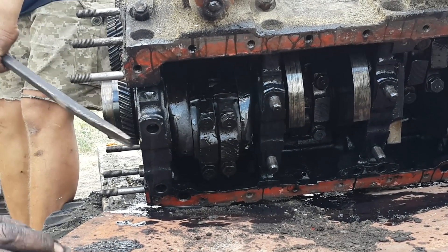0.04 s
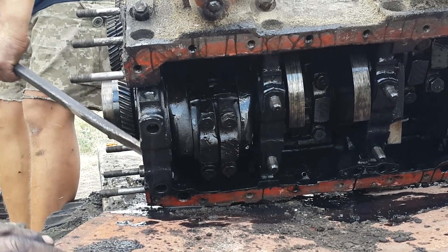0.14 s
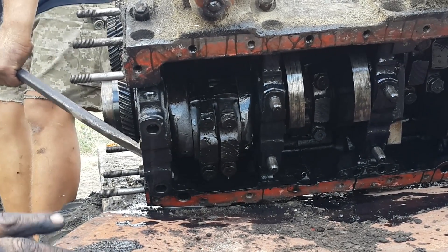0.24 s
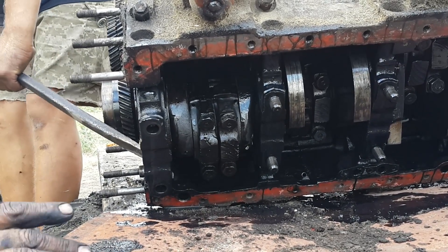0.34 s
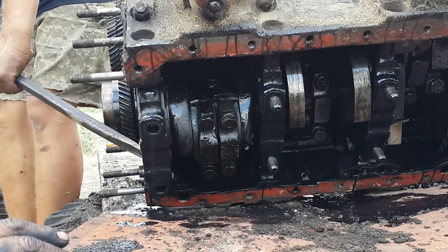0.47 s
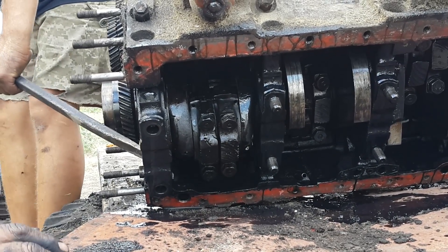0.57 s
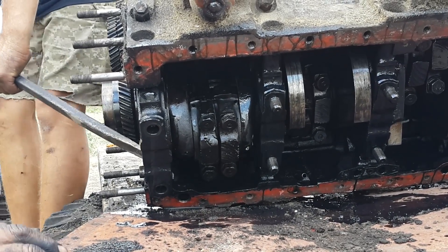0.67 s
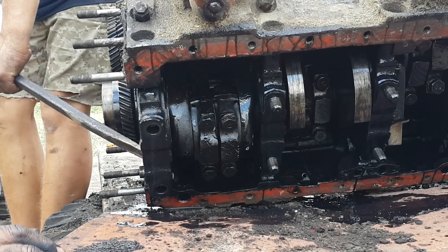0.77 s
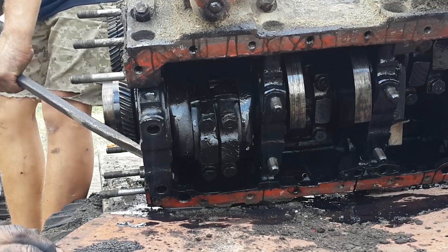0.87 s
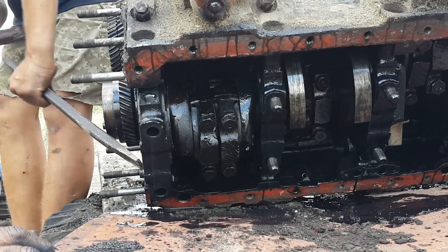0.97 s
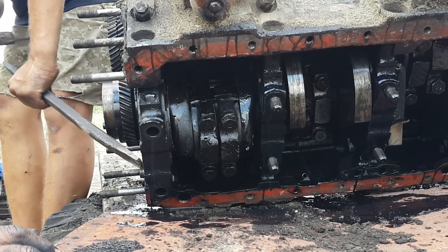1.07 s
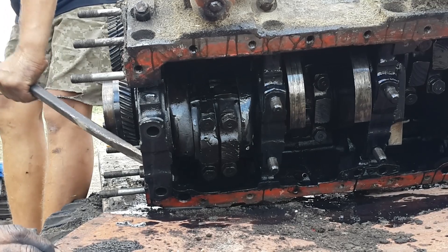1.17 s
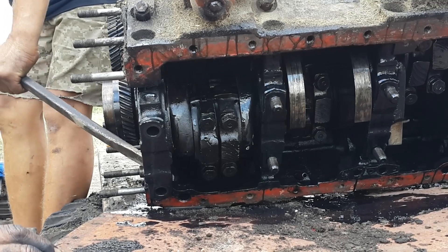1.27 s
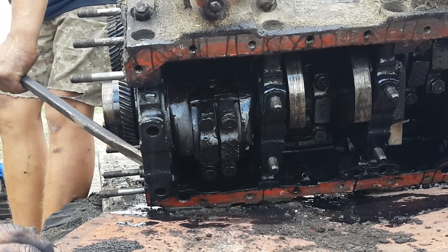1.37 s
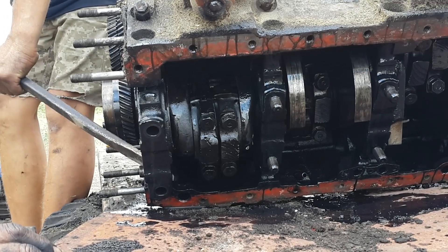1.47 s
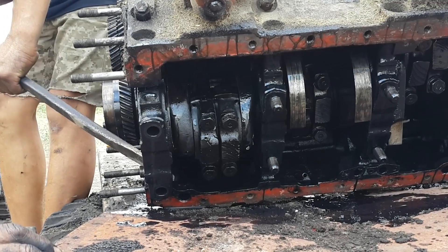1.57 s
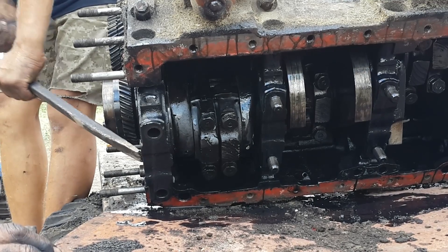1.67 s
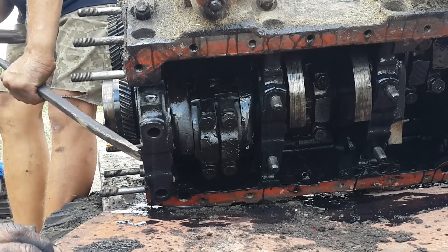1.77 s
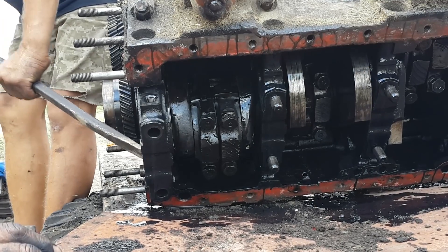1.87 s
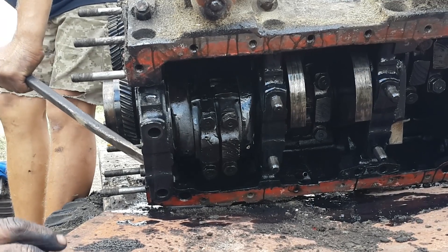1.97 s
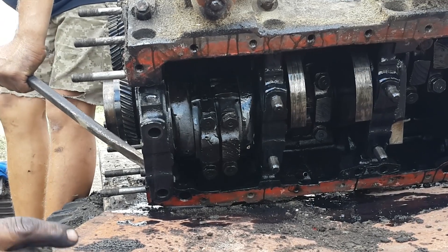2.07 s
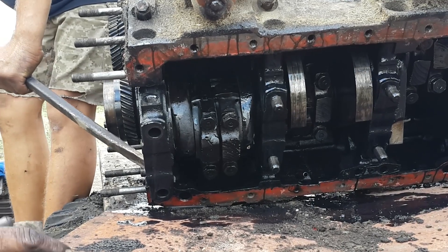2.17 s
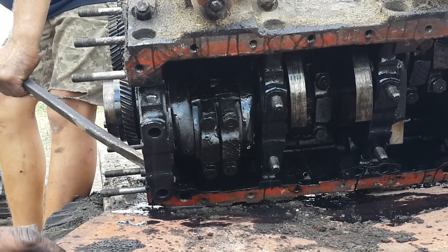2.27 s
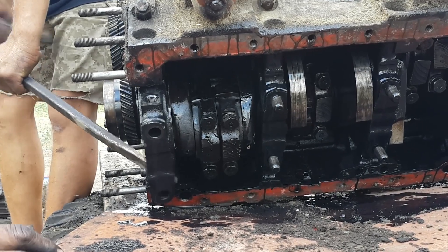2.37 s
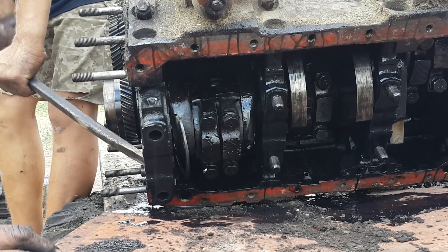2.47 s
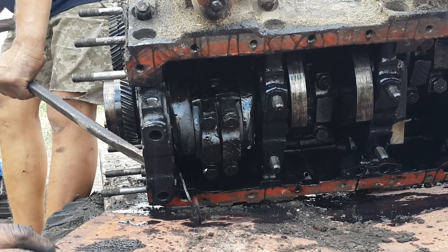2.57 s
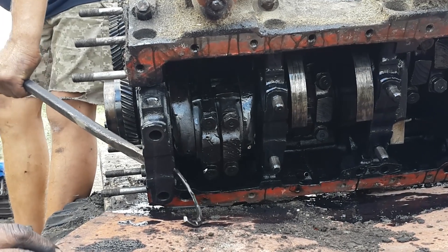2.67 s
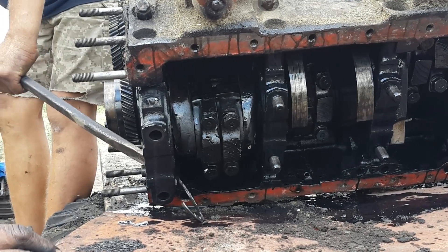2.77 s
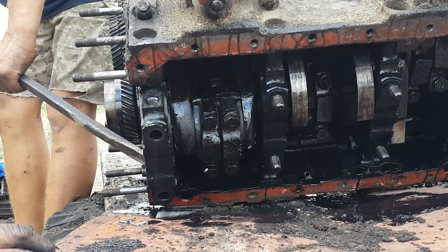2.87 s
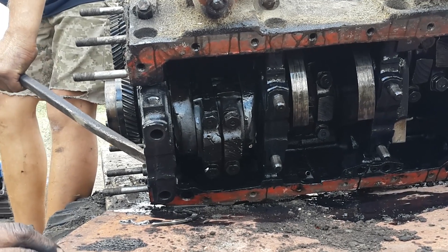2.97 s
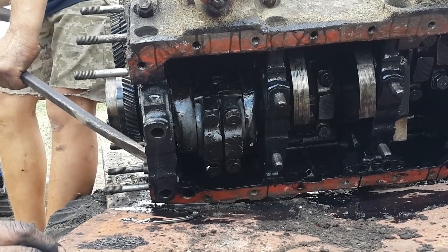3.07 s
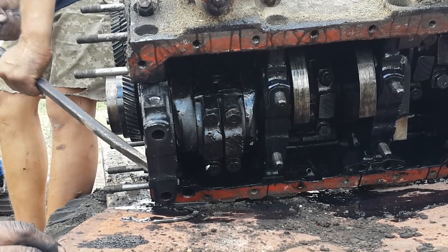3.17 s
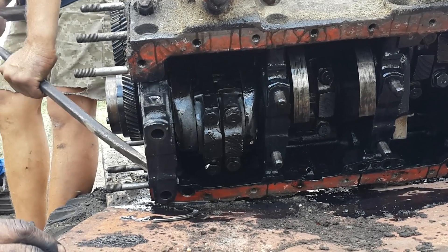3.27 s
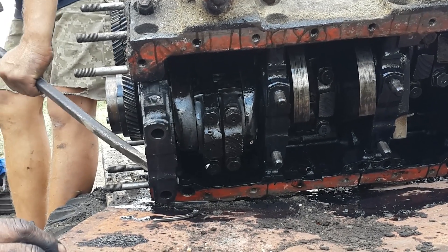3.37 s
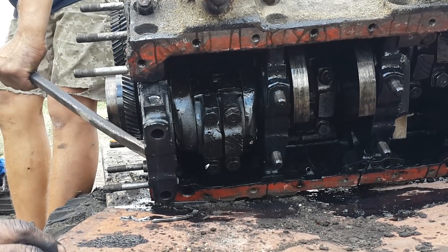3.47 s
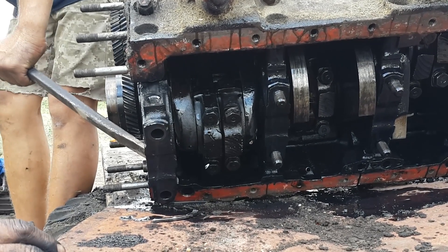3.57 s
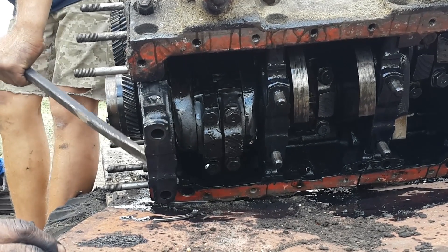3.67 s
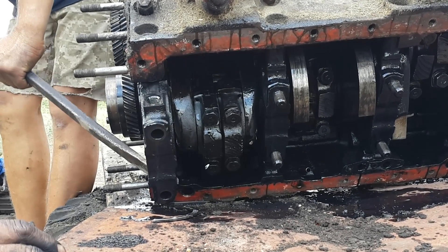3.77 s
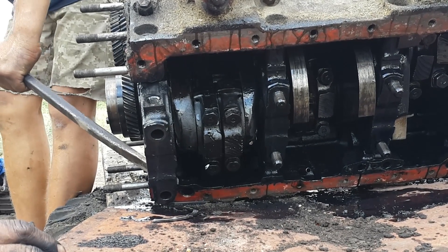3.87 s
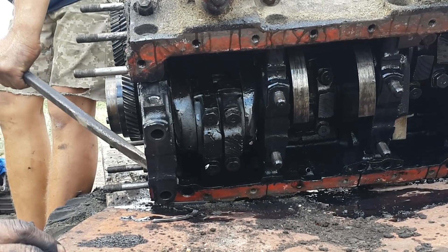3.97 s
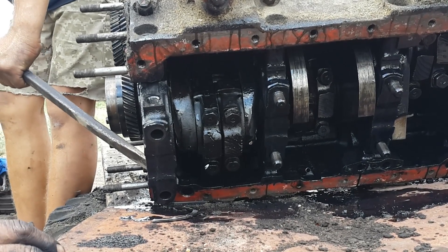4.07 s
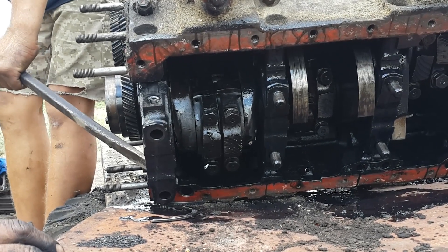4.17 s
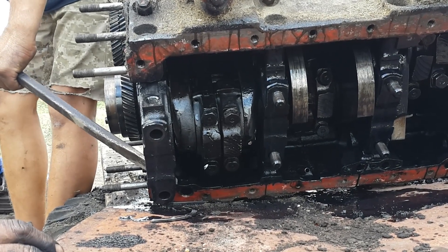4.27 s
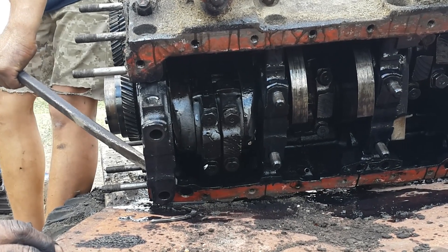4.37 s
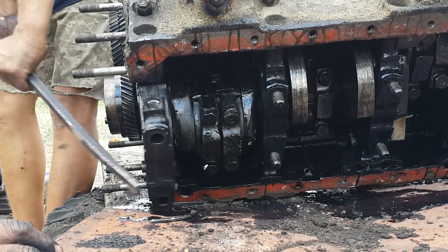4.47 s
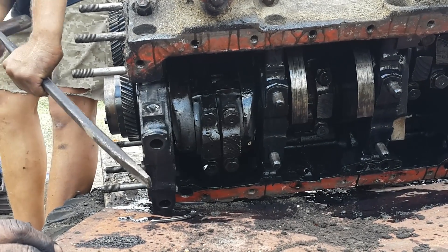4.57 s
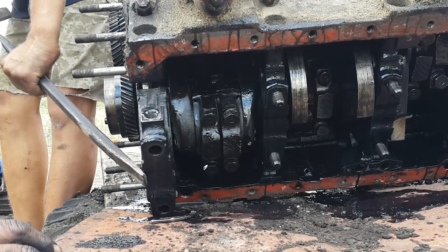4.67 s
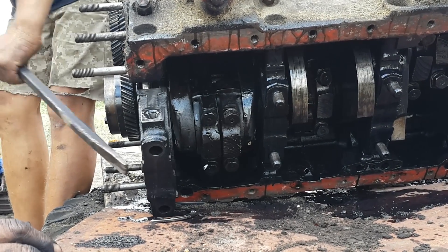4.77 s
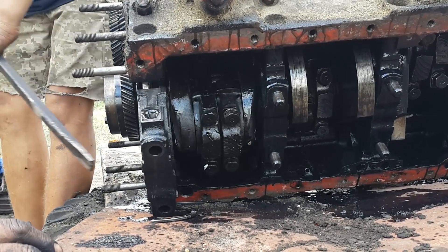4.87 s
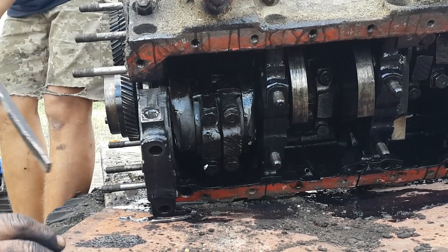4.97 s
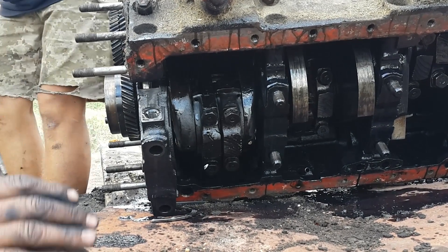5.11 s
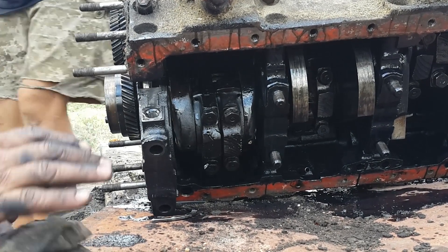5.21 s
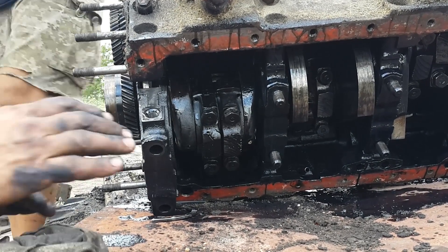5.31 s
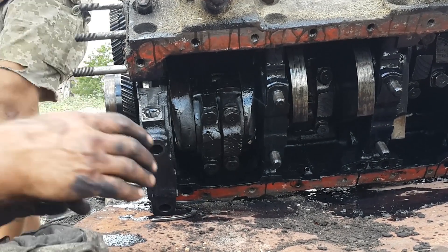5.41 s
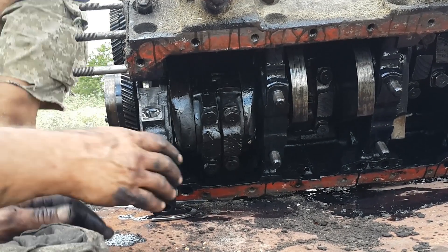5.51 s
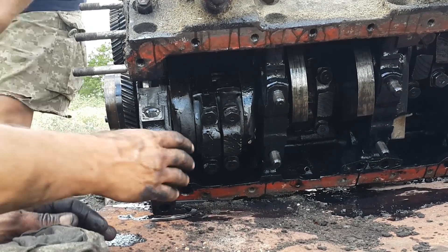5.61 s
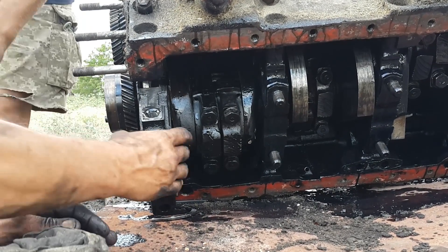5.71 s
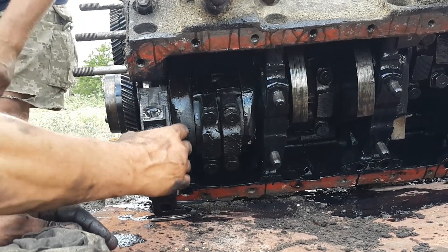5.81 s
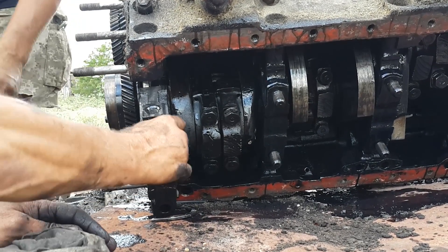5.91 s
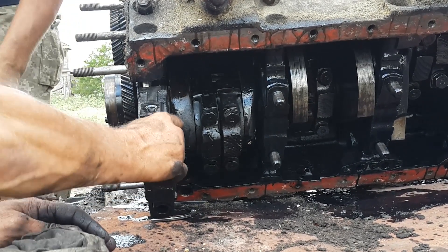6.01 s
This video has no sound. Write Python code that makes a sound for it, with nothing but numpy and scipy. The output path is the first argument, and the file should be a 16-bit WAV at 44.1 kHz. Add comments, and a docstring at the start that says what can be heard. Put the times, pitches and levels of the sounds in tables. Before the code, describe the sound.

Outdoors and very close, a steel bar taps, then strikes a seized part in an iron engine block five times, hard and distorted, with short damped clangs. Skids and tiny squeals follow some blows. A thin washer drops, clinks and rattles to rest after the third. Low gusts flutter against the left microphone, and finally a hand rubs softly with small ticks.

```python
"""Steel bar on a seized bearing cap

Outdoors, close to a phone: a bar is jabbed against the cap in an open cast-iron engine block.
Five hard blows, built from block noise and decaying bar modes, overload the microphones; between them
the bar taps, and its tip scrapes by random slips and squeals by short sweeps. A thin thrust washer rings
as decaying modes; knocks, ticks, hand rubs, wind on the left port and yard air are shaped noise,
with a wavering tone in the wind and a thin whine in the yard."""
import sys
import numpy as np
from scipy import signal
from scipy.fft import rfft, irfft, next_fast_len
from scipy.io import wavfile
from scipy.ndimage import uniform_filter1d

SR = 44100
rng = np.random.default_rng(int(sys.argv[2]) if len(sys.argv) > 2 else 0)


def put_to_file(sound):
    """Save the sound as 16-bit audio at rate SR, in the file named by the first command-line argument."""
    columns = np.atleast_2d(sound).T  # one column per channel
    safe = np.clip(columns, -1, 1)
    whole_steps = np.round(safe * 32767)
    wavfile.write(sys.argv[1], SR, whole_steps.astype(np.int16))


N = 266751
TIME = np.arange(N) / SR  # s
AGE = np.arange(int(.4 * SR)) / SR  # s since a contact
TOP_HZ = 15800  # upper limit of the microphones

# All spectra: (frequency [Hz], relative density [dB per Hz])
# open air of the yard
YARD_SPECTRUM = [(18, -46), (30, -21), (90, 4.5), (170, -5.5), (295, -21.5), (780, -12), (1670, -21),
                 (6380, -17.5), (7270, -23.5), (14000, -28), (16000, -19)]
YARD_DB = -67.2
WHINE_HZ, WHINE_DB = 9340, -80

# gusts at the left port: (time [s], length [s], relative level [dB], change along the gust [dB])
GUSTS = [(.07, .13, -36, -2), (.3, .23, -36.5, -7), (.67, 0.33, -40, 4), (1.003, .055, -27.5, -2),
         (1.225, .17, -38, 8), (1.473, .04, -24, -3.5), (1.669, 0.068, -39, -3), (2.056, 0.52, -31.5, 1),
         (2.66, 0.43, -36, 1), (3.431, 0.048, -37, -2), (3.52, 0.25, -32, -9), (3.877, .33, -56, -2),
         (4.7, .2, -54, -2), (4.908, .13, -47, 3), (5.19, .03, -56, -6), (5.373, 0.042, -58, -3),
         (5.68, 0.044, -41, 2), (5.84, 0.062, -40.5, 6.5), (5.982, .07, -45.5, -6)]
GUST_ATTACK_S, GUST_RELEASE_S = .009, .03
CALM_DB = -76  # air that still moves between gusts, relative as in GUSTS
# hardest single eddies slapping the port: (time [s], relative level [dB])
EDDIES = [(0.305, -26.5), (0.43, -38), (0.884, -20), (0.894, -21.5), (1.04, -31), (1.312, -26),
          (1.468, -24.5), (1.69, -37), (2.053, -23.5), (2.165, -32), (2.273, -30), (2.34, -33.5),
          (3.066, -25), (3.522, -31.5)]
# spectrum of the buffeting
BUFFET_SPECTRUM = [(20, -33.5), (45, -24), (80, -10), (130, -1), (230, -1.5), (330, -7), (500, -13.5),
                   (800, -29.5), (1300, -49), (2500, -62.5)]
# spectra of the wind's fine slap and its slow rumble
SLAP_SPECTRUM = [(150, -18.5), (400, -4), (750, -3.0), (1300, -18), (2400, -38), (5000, -71), (12000, -87.5)]
RUMBLE_SPECTRUM = [(20, -8.5), (70, 0.5), (130, 11.0), (250, -18.5), (800, -58.0), (2000, -86.0)]
# vortex flutter: pitch at the strongest gust, its change per dB of gust, level against the gust
VORTEX_HZ, VORTEX_OCTAVES_PER_DB, VORTEX_DB = 219.7, -0.04, -6

# skin and cloth rubs: (time [s], length [s], relative level [dB], change along the stroke [dB])
RUBS = [(4.4, 0.2, -66, -4), (5.191, 0.39, -66.5, -7.5), (5.607, 0.11, -64, -1), (5.712, 0.335, -58.5, 3.5),
        (5.978, 0.018, -44, 3)]
RUB_ATTACK_S, RUB_RELEASE_S = 0.01, .012
# spectrum of rubbing skin and cloth
SKIN_SPECTRUM = [(290, -7), (500, 9), (718, -10), (795, 0), (1380, 3), (1820, -2), (9770, -12.5),
                 (16000, -19)]
# spectrum of swishing shorts
SWISH_SPECTRUM = [(500, -23), (2500, -9.0), (5300, 2), (8000, -8.5), (14000, -26)]

# spectrum of the reflections from the ground and things nearby
TAIL_SPECTRUM = [(100, 9.0), (500, 12.0), (1500, -0.5), (4000, -14.0), (6500, -8), (9000, -14.5), (15000, -18)]

# dull knocks on the bed under the engine: (time [s], level [dB], 60 dB decay [s])
KNOCKS = [(2.731, -14.5, 0.23), (2.809, -42.5, 0.84), (2.907, -42, .25), (3.088, -23.5, .15),
          (3.121, -21, 0.16), (5.187, -42, .13)]
# spectrum of the knocked bed
BED_SPECTRUM = [(50, -16.5), (180, -7), (380, -3.5), (540, 4), (700, 1.5), (930, 9), (1200, 3.5),
                (2200, 0.5), (3500, -9.5), (6000, -12), (10000, -24.5), (16000, -41)]
# dry ticks of grit and fingertips: (time [s], level [dB])
TICKS = [(0.928, -48.5), (4.183, -61.5), (5.603, -31), (5.757, -49.5), (5.786, -50), (5.892, -48)]
# spectrum of small hard contacts
CLICK_SPECTRUM = [(200, -13.5), (900, -2), (2500, -0.5), (4200, 2), (6500, 0), (8000, -5.5), (10000, 3),
                  (12000, -16.5), (16000, -6.5)]

# the washer slips, lands and topples: (time [s], click level [dB], relative ring level [dB])
WASHER_HITS = [(2.575, -30, -19), (2.611, -14.5, -40), (2.657, -31.5, -38), (2.7297, -7.5, -46),
               (3.058, -40.5, -55.5), (3.0897, -10, -40.5), (3.094, -16, -41.5)]
# thin steel half ring: (frequency [Hz], relative level [dB], unscaled 60 dB decay [s], left minus right [dB])
WASHER_MODES = [(1292, -4, .3, 2), (1529, -3, .35, 2), (2719, -10, .35, 3), (4046, -6, .4, 7),
                (4912, -5, .35, 7), (6654, -9, .22, 6), (7020, -8, .26, 6), (8050, -2, .23, 7),
                (8500, -5, .45, 7), (9950, -2, .07, 9), (11565, -7, .2, 8), (12000, -12, .2, 8),
                (14068, -2, .23, 9)]
WASHER_TOP_HZ = 8500  # highest well-driven pitch
# rocking after landing: first touch, first gap, share of the gap kept each time
ROCKS_FROM_S, FIRST_GAP_S, GAP_SHARE = 2.809, .056, .71
# first touch, and loss from touch to touch
TOUCH_CLICK_DB, TOUCH_RING_DB, TOUCH_LOSS_DB = -32.5, -37, 3

# the work favours one port: (frequency [Hz], left minus right [dB])
FACING = [(100, -7.5), (400, 2), (750, -1), (1300, 0), (2400, 3), (4400, 12.5), (8000, 9.5), (15000, 5)]
# bar meets iron: (time [s], relative block level [dB], relative bar level [dB],
# highest well-driven pitch [Hz], flat over edgewise bending [dB])
BLOWS = [(0.0, -25, -40, 3400, 5), (0.252, -29, -22.5, 2500, 0), (0.327, -32, -40, 3000, 3),
         (1.0826, 5.5, -5, 6600, -2), (1.119, -19, -15, 3300, 3), (1.317, -49.5, -55, 4300, 11.5),
         (1.35, -31.5, -30.5, 2830, 18), (1.811, 7, 3, 5590, -4), (1.823, -5.5, -7.5, 3700, -19),
         (2.071, -32, -28, 2296, 13), (2.2, -38.5, -47, 3990, 0), (2.569, 8.5, 1.5, 5880, 5),
         (3.284, 4, 2.5, 5900, -1), (3.333, -25, -17.5, 7500, 10), (3.36, -25.5, -27.5, 3500, 4),
         (3.871, -39, -43.5, 4070, -7), (3.91, -38, -44.5, 2300, -4.5), (4.615, 6, -.5, 5290, -5),
         (4.675, -20, -18, 9070, -14), (4.746, -24, -25.5, 4400, -2), (4.869, -34, -33.5, 4350, 16)]
# flat bar pressed on the cap: (frequency [Hz], relative level [dB], unscaled 60 dB decay [s],
# left minus right [dB], bending plane [1 flat, -1 edgewise, 0 neither])
BAR_MODES = [(1165, -6, .18, -3, -1), (1290, -6, .09, -5, 0), (1375, -4, .09, -4, 0), (1527, -5, .1, -3, 0),
             (1900, -2, .17, 0, 1), (2000, -11, .09, 2, 0), (2178, -6, .17, 2, -1), (2666, -10, .09, 2, 0),
             (2917, -9, .09, 0, 0), (2987, 1, .19, -1, 1), (3408, -9, .1, 2, 0), (3482, 0, .15, 2, -1),
             (4064, -7, .12, 6, 0), (4286, -1, .15, 9, 1), (5047, -7, .14, 7, -1), (5822, -2, .16, 11, 1),
             (5965, -9, .11, 8, 0), (6569, -7, .17, 5, 0), (6850, -12, .15, 5, -1), (7520, -13, .12, 0, 1),
             (8510, -6, .19, 7, 0), (8900, -11, .13, 7, -1), (10770, -9, .12, 8, 0), (11420, -9, .13, 8, 0),
             (11930, -9, .12, 8, 0), (14100, -4, .14, 10, 0), (14750, -8, .14, 10, 0)]
# spectrum of the block's crowded, quickly damped modes
BLOCK_SPECTRUM = [(40, -34), (130, -11), (400, -9.5), (800, -7.5), (1200, 2), (1600, -0.5), (2600, -2),
                  (4000, -7), (6000, -9), (9000, -9), (13000, -13), (16000, -9)]
# spectrum of the crankcase walls
WALL_SPECTRUM = [(150, -5.5), (1100, 3), (3500, -7), (6500, -11), (10000, -20.5), (16000, -33.5)]
# a hard blow presses the tip on and shortens the ring: length factor at 0 dB, and its gain per dB softer
PRESSED_LENGTH, LENGTH_PER_DB = 0.52, 0.0089
# the tip skids over iron: (time [s], length [s], relative level [dB], change along the stroke [dB],
# highest well-driven pitch [Hz])
SKIDS = [(1.105, 0.036, -21, -6, 8500), (1.855, 0.011, -27, -3.5, 6000), (2.6, .04, -28, -10, 5490),
         (3.314, .05, -20.5, -14, 5900), (3.587, 0.1, -52, 4, 4300), (3.956, 0.033, -61, -4, 2200),
         (4.063, .055, -56.5, 6.5, 4200), (4.14, 0.011, -57, -2, 1900), (4.636, 0.079, -16.5, -6, 5620),
         (4.749, .06, -26, -3, 4200), (4.833, 0.057, -44.5, -1, 2880)]
SKID_ATTACK_S, SKID_RELEASE_S = .012, .009
SKID_LOW_HZ = 470  # slips are too small to move the block below this
# the skidding tip squeals: (time [s], relative level [dB], centre pitch [Hz], half length [s])
SQUEALS = [(3.348, -25.5, 5980, 0.0026), (4.661, -13.5, 5200, .0015), (4.68, -17, 5900, 0.0046),
           (4.681, -21.5, 8900, .004), (4.692, -16, 4960, .002), (4.794, -28, 2855, 0.0062)]
SQUEAL_FALL_OCTAVES = .04  # per half length


def undb(db):
    """Decibels to gain."""
    return 10 ** (np.asarray(db) / 20)


def unit(x):
    """Scale to rms 1."""
    return x / np.sqrt(np.mean(x ** 2))


def pan(db):
    """Left and right gains for a level difference."""
    return undb(np.array([[1], [-1]]) * db / 2)


def lookup(points, hz):
    """Read (frequency [Hz], value) points on a log-frequency axis."""
    point_hz, value = np.transpose(points)
    return np.interp(np.log(hz + 1), np.log(point_hz), value)


def colour(x, points):
    """Give a noise a spectrum, at rms 1."""
    size = next_fast_len(x.shape[-1])
    gain = undb(lookup(points, np.fft.rfftfreq(size, 1 / SR)))
    return unit(irfft(rfft(x, size) * gain, size)[..., :x.shape[-1]])


def at_ports(size, alike_hz=800):
    """Stereo noise from the work: long waves reach both ports alike, short ones differ; FACING sets the side."""
    hz = np.fft.rfftfreq(size, 1 / SR)
    mid, side = rfft(rng.standard_normal((2, size)))
    alike = 1 / (1 + (hz / alike_hz) ** 4)
    both = mid * np.sqrt(1 + alike) + np.array([[1], [-1]]) * side * np.sqrt(1 - alike)
    return irfft(both * pan(lookup(FACING, hz)), size)


def fade(t60):
    """Exponential decay by 60 dB in t60 seconds."""
    return undb(-60 * AGE / t60)


def walk(rate):
    """Smooth random wandering with rms 1, renewed at a rate in Hz."""
    hold = max(int(SR / rate), 1)
    steps = rng.standard_normal(N)[np.arange(N) // hold]
    return unit(uniform_filter1d(steps, hold))


def add(out, s, sound):
    """Mix a sound in at a time in seconds."""
    i = max(int(s * SR), 0)
    out[:, i:i + sound.shape[1]] += sound[:, :N - i]


def swell(s, length, db, change_db, attack_s, release_s):
    """A stroke or gust: it builds up until its start time, holds with a steady slope, then dies away."""
    out = np.zeros(N)
    near = (TIME > s - 4 * attack_s) & (TIME < s + length + 10 * release_s)
    age = TIME[near] - s
    hold = undb(db + change_db * np.clip(age / length, 0, 1))
    build = (np.minimum(age, 0) / attack_s) ** 2
    release = np.maximum(age - length, 0) / release_s
    out[near] = hold * np.exp(-build - release)
    return out


def contact(hz, top_hz, above_db=16, below_db=5.5):
    """Drive in dB: falls fast above a pitch set by the contact's hardness, gently below (dB per octave)."""
    octaves = np.log2((hz + 1) / top_hz)
    return -above_db * np.maximum(octaves, 0) + below_db * np.minimum(octaves, 0)


def port_lags(modes):
    """Each mode reaches the right port up to a third of a cycle before or after the left."""
    return np.array([[0], [1]]) * rng.uniform(-1, 1, len(modes)) / 3


def ring(modes, lags, drive_db, length, scatter_db=2.0):
    """Decaying modes of one contact; each strike weights them a little anew, with random signs."""
    hz, db, t60, pan_db = np.transpose(modes)[:4]
    size, turn = rng.standard_normal((2, len(hz)))
    gain = undb(db + drive_db + scatter_db * size)
    gain = gain * np.sign(turn) * np.sqrt(2 / np.sum(gain ** 2))
    swing = np.exp(np.outer(2j * np.pi * hz - np.log(1000) / (t60 * length), AGE))
    return ((gain * pan(pan_db) * np.exp(2j * np.pi * lags)) @ swing).imag


def yard():
    """Faint open-air noise, partly shared by the ports, with a thin, slightly wavering whine."""
    noise = rng.standard_normal((2, N)) + .6 * rng.standard_normal(N)
    air = colour(noise, YARD_SPECTRUM) * undb(YARD_DB + 1.2 * walk(3))
    whine = np.sin(2 * np.pi * np.cumsum(WHINE_HZ + 12 * walk(40)) / SR)
    return air + undb(WHINE_DB) * whine * pan(4.8)


def vortices(gust, wander_octaves=.15, flutter_db=3.5):
    """Vortices shed at the port: a wavering tone, lowest in the strongest gust and higher in weaker wind."""
    gust_db = 20 * np.log10(gust / gust.max())
    octaves = VORTEX_OCTAVES_PER_DB * gust_db + wander_octaves * walk(35)
    tone = np.sqrt(2) * np.sin(2 * np.pi * np.cumsum(VORTEX_HZ * 2 ** octaves) / SR)
    return undb(VORTEX_DB + flutter_db * walk(60)) * gust * tone


def slaps(decay_s, rise_s=0.00095):
    """Strength of the hard eddies: each arrives abruptly and blows itself out."""
    out = np.zeros((1, N))
    shape = np.minimum(AGE / rise_s, 1) * np.exp(-AGE / decay_s)
    for s, db in EDDIES:
        add(out, s, undb(db) * shape[None])
    return out[0]


def wind(flutter_db=3.5, slap_db=-17, snap_db=0.0, right_db=-22, rumble_db=-16, buffet_db=1.0):
    """Turbulence, mostly on the left port; the hardest eddies snap and reach higher in pitch."""
    gust = undb(CALM_DB) + sum(swell(*row, GUST_ATTACK_S, GUST_RELEASE_S) for row in GUSTS)
    breeze = gust * undb(buffet_db + flutter_db * walk(55))
    push = np.hypot(breeze, slaps(decay_s=0.018))
    # separate eddies, about 1000 a second, each a single swing of pressure
    bumps = (rng.random((2, N)) < 1000 / SR) * rng.standard_normal((2, N))
    left, right = colour(bumps, BUFFET_SPECTRUM)
    fine = colour(rng.standard_normal(N), SLAP_SPECTRUM)
    crackle = undb(7 * np.tanh(walk(110)))
    # the fine noise grows faster than the breeze
    gust_slap = undb(slap_db) * crackle * breeze * np.sqrt(breeze / breeze.max())
    slap = fine * (gust_slap + undb(snap_db) * slaps(decay_s=.004))
    # the sheltered right port hears weak buffeting and the slow rumble
    rumble = undb(rumble_db) * colour(rng.standard_normal((2, N)), RUMBLE_SPECTRUM) * breeze
    return np.array([left * push + slap + vortices(gust), undb(right_db) * right * push]) + rumble


def hand(grain_db=2.5):
    """Grainy rubbing of cloth and of the hand that grips the cap: noise under swelling effort."""
    effort = sum(swell(*rub, RUB_ATTACK_S, RUB_RELEASE_S) for rub in RUBS)
    # the shorts swish as the worker steps away
    passing = np.exp(-((TIME - 5.28) / 0.062) ** 2)
    swish = colour(at_ports(N), SWISH_SPECTRUM) * undb(-59) * passing
    rubbing = colour(at_ports(N), SKIN_SPECTRUM) * effort
    return (rubbing + swish) * undb(grain_db * walk(300))


def surroundings(x, wet_db=-34):
    """Weak, duller reflections from the ground and things nearby: a decaying noise tail."""
    tail = colour(rng.standard_normal((2, len(AGE))), TAIL_SPECTRUM)
    tail = tail * fade(.29) * np.minimum(AGE / .02, 1)
    tail = tail / np.sqrt(np.sum(tail ** 2) / 2)
    return undb(wet_db) * signal.fftconvolve(x, tail, axes=1)[:, :N]


def click(t60):
    """A short bright contact noise."""
    return colour(at_ports(len(AGE)), CLICK_SPECTRUM) * fade(t60)


def knocks_and_ticks():
    """The bed answers with dull decaying noise; grit and fingertips tick."""
    out = np.zeros((2, N))
    bed = colour(at_ports(len(AGE)), BED_SPECTRUM)
    for s, db, t60 in KNOCKS:
        add(out, s, undb(db) * bed * fade(t60) * np.minimum(AGE / 0.0013, 1))
    for s, db in TICKS:
        add(out, s, undb(db) * click(t60=0.024))
    return out


def rocking(count):
    """Touches of the rocking washer, each after a shorter gap and weaker than the last."""
    touches = []
    for k in range(count):
        s = ROCKS_FROM_S + FIRST_GAP_S * np.sum(GAP_SHARE ** np.arange(k))
        loss_db = k * TOUCH_LOSS_DB
        touches.append((s, TOUCH_CLICK_DB - loss_db, TOUCH_RING_DB - loss_db))
    return touches


def washer(click_t60=0.026, length=.82):
    """The loose washer clicks at each contact and its modes ring on thinly; after landing it rocks."""
    out, lags = np.zeros((2, N)), port_lags(WASHER_MODES)
    drive_db = contact(np.array(WASHER_MODES)[:, 0], WASHER_TOP_HZ)
    for s, click_db, ring_db in WASHER_HITS + rocking(count=5):
        tone = ring(WASHER_MODES, lags, drive_db, length)
        add(out, s, undb(click_db) * click(click_t60) + undb(ring_db) * tone)
    return out


def squeals(waver=.06):
    """Short bursts of fast stick-slip: tones unsteady in level and pitch, with a falling trend."""
    out, drift = 0, waver * walk(900)
    for s, db, hz, half_s in SQUEALS:
        along = (TIME - s) / half_s
        pitch = hz * 2 ** (drift - SQUEAL_FALL_OCTAVES * np.clip(along, -2, 2))
        tone = np.sqrt(2) * np.sin(2 * np.pi * np.cumsum(pitch) / SR)
        out = out + undb(db) * np.exp(-.5 * along ** 2) * tone
    return out * pan(7) * undb(3 * walk(1500) - 3)


def drag(slip_rate=450, slip_db=5, block_share=1.15, block_t60=0.035, length=.38, reach=1.4):
    """The skidding tip sticks and slips; every random slip ticks the bar and the block."""
    out, lags = np.zeros((2, N)), port_lags(BAR_MODES)
    block = block_share * colour(at_ports(len(AGE)), BLOCK_SPECTRUM) * fade(block_t60)
    slipping = rng.random(N) < slip_rate / SR  # slips per second
    strength = undb(slip_db * np.tanh(rng.standard_normal(N)))
    slips = unit(slipping * strength * rng.choice([-1, 1], N))
    for s, *stroke, top_hz in SKIDS:
        edges = [SKID_LOW_HZ, min(reach * top_hz, TOP_HZ)]
        band = signal.butter(2, edges, "bandpass", fs=SR, output="sos")
        drive_db = contact(np.array(BAR_MODES)[:, 0], top_hz)
        body = signal.sosfilt(band, block) + ring(BAR_MODES, lags, drive_db, length)
        body = body / np.sqrt(np.sum(body ** 2) / 2)
        force = slips * swell(s, *stroke, SKID_ATTACK_S, SKID_RELEASE_S)
        touching = np.flatnonzero(force)
        first, last = touching[0], touching[-1]
        add(out, first / SR, signal.fftconvolve(force[None, first:last + 1], body, axes=1))
    return out


def jabs(block_t60=0.11, rise_s=.0015, fresh=0.99, reach=1.1, after_db=-31, after_t60=0.27):
    """Each jab excites the block's dense damped modes and the bar in its two bending planes."""
    out, lags = np.zeros((2, N)), port_lags(BAR_MODES)
    hz, plane = np.transpose(BAR_MODES)[[0, -1]]
    casting, attack = at_ports(len(AGE)), np.minimum(AGE / rise_s, 1)
    # the tip settles against the iron and chokes the bar's ring
    choke = np.exp(-(AGE / .068) ** 3)
    for s, clang_db, ring_db, top_hz, flat_db in BLOWS:
        length = PRESSED_LENGTH - LENGTH_PER_DB * ring_db
        # one shared casting noise, plus a fresh part for each strike point
        clang = colour(casting + fresh * at_ports(len(AGE)), BLOCK_SPECTRUM)
        # contacts with a lower driven pitch lose more treble
        lowpass = signal.butter(2, min(reach * top_hz, TOP_HZ), fs=SR, output="sos")
        clang = unit(signal.sosfilt(lowpass, clang))
        # the crankcase walls ring on faintly behind the clang
        walls = colour(at_ports(len(AGE)), WALL_SPECTRUM)
        block = clang * fade(block_t60 * length) + undb(after_db) * walls * fade(after_t60)
        drive_db = contact(hz, top_hz) + plane * flat_db / 2
        tone = choke * ring(BAR_MODES, lags, drive_db, length)
        add(out, s, attack * (undb(clang_db) * block + undb(ring_db) * tone))
    return out


def bar_on_block():
    """All that the bar does: it strikes, drags and squeals."""
    return jabs() + drag() + squeals()


def scene():
    """The metalwork and its reflections, with hand, wind and background."""
    metal = bar_on_block() + washer() + knocks_and_ticks()
    return metal + surroundings(metal) + hand() + wind() + yard()


def record(dry):
    """The microphones overload: peaks clip flat at 0.9 of full scale, then the top is cut."""
    clipped = np.clip(dry, -.9, .9)
    return signal.sosfilt(signal.ellip(8, .2, 70, TOP_HZ, fs=SR, output="sos"), clipped)


dry = scene()
out = record(dry)
put_to_file(out)
```